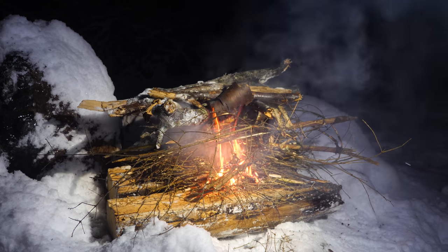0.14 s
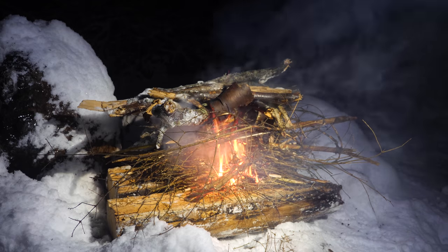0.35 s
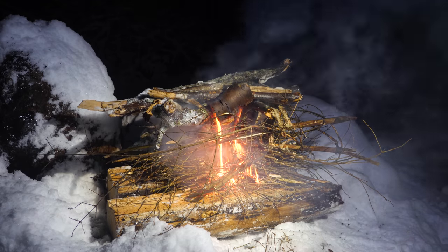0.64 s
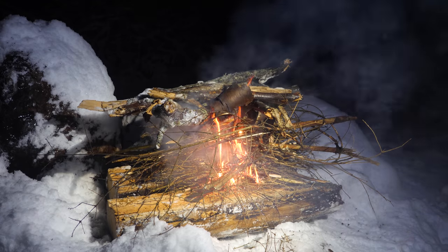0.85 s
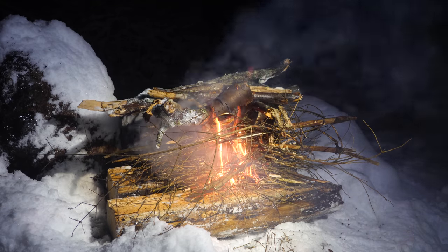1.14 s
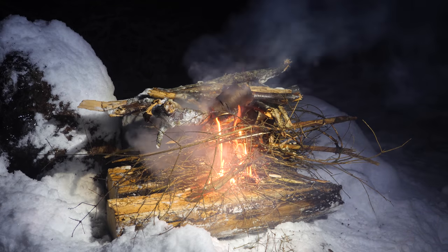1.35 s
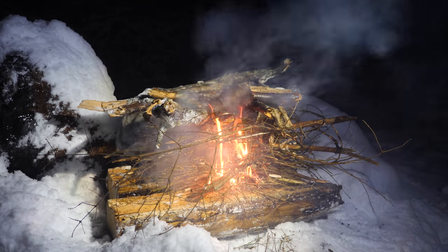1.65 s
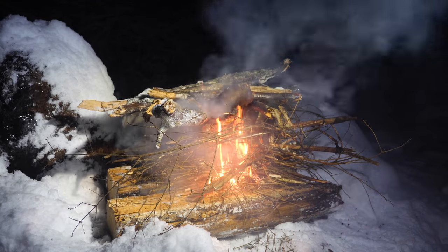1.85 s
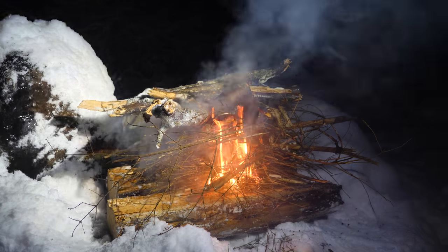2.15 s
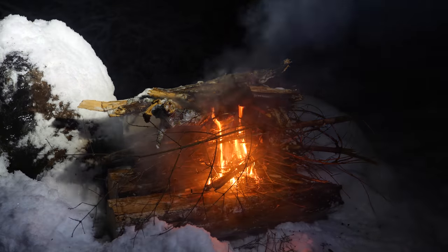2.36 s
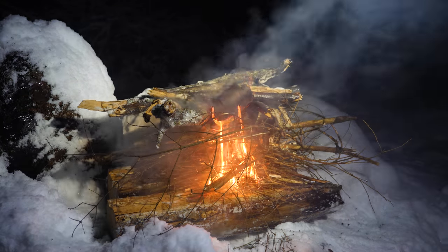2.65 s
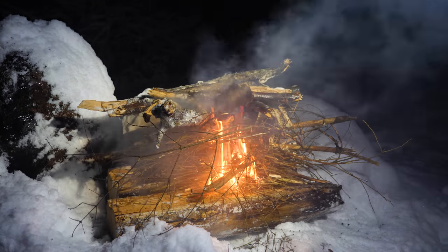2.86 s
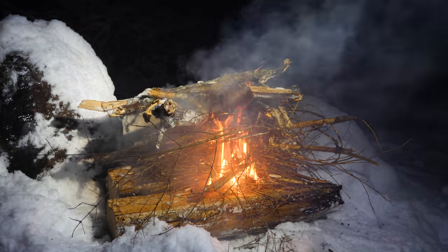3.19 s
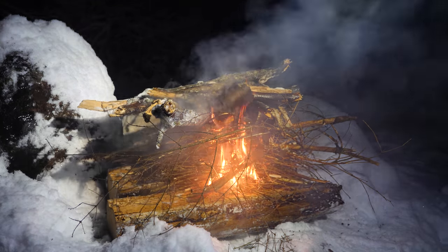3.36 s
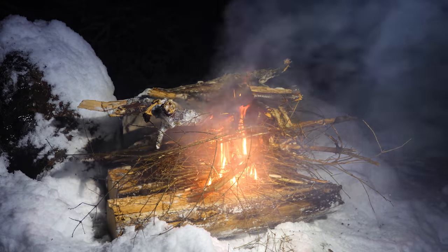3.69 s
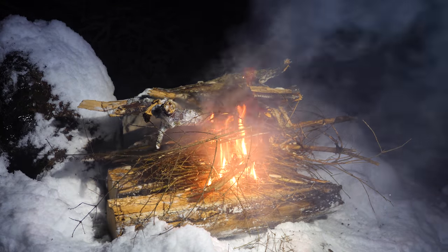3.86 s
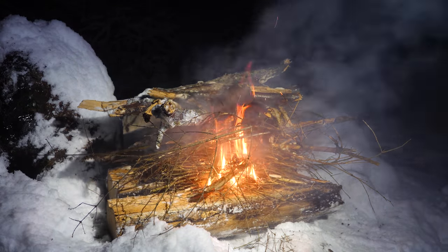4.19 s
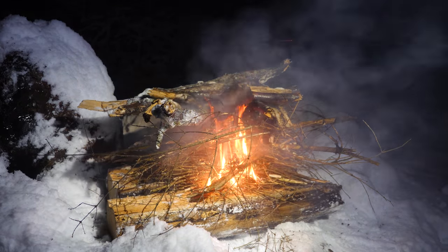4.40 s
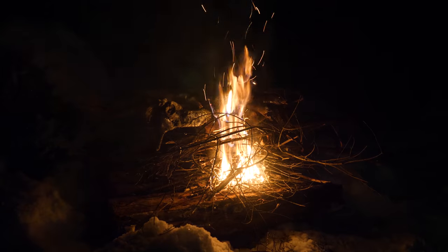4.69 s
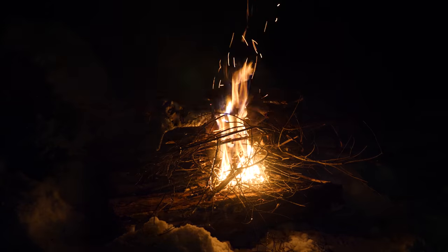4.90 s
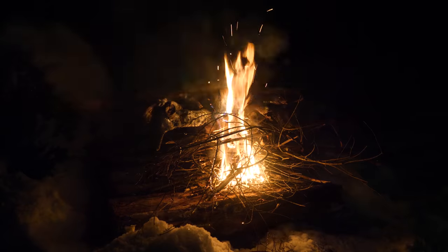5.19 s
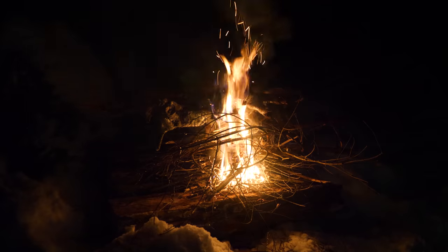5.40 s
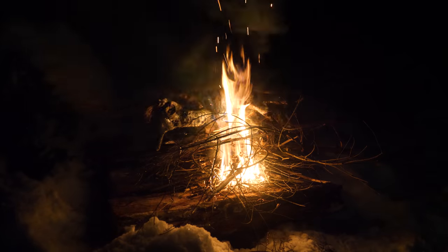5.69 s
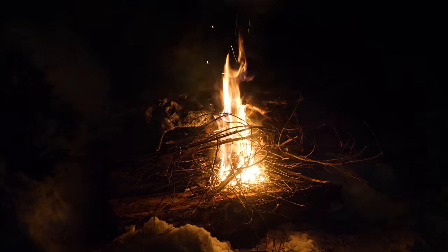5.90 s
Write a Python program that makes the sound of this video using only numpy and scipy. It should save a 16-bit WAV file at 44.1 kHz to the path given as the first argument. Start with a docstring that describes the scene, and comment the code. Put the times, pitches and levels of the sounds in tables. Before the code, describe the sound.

Close campfire crackling outdoors, without room reverberation. Irregular snaps with brief spits of steam stand out over tiny ticks, soft seething and a faint hollow draught. Isolated strong cracks arrive around the middle; after four and a half seconds the flame puffs more fully and pops crowd together, with short low log knocks. The fire is centred, with slight patchy treble width.

```python
"""A campfire of wet logs and twigs in the snow at night, heard close up on a small microphone.
Pockets of steam and resin burst in the wood: each is a short crack and a jet of treble noise, with a faint
noise rising for a few milliseconds before it. A fine crackle of small pockets runs in flurries between the
loud pops, and logs give short dull knocks, often together with a pop.
Beneath lie shaped noises: the flutter of the flame, a hollow draught through the stack and the hiss of sap."""
import sys
import numpy as np
from scipy import signal
from scipy.fft import rfft, irfft
from scipy.io import wavfile
from scipy.ndimage import uniform_filter1d, map_coordinates

SR = 44100
rng = np.random.default_rng(int(sys.argv[2]) if len(sys.argv) > 2 else 0)


def how_loud(loudness_db):
    """Turn decibels into a plain amplitude multiplier (0 dB gives 1, 20 dB gives 10)."""
    steps = np.asarray(loudness_db, float) / 20
    return 10 ** steps


def unload_audio(sound):
    """Save the sound as a 16-bit wav file, at the path given as the first command line argument."""
    columns = np.transpose(np.atleast_2d(sound))
    # keep every value between -1 and 1, then stretch to whole-number steps
    steps = np.round(np.clip(columns, -1, 1) * 32767)
    wavfile.write(sys.argv[1], SR, steps.astype(np.int16))


N = 266364
LENGTH = 448  # samples of one burst

# loud pockets bursting: (t/s, level/dB, nominal crack f/Hz, jet gain/dB re crack)
POPS = [(0.0941, -19, 3940, -8), (0.3085, -16, 3750, -4), (0.3179, -13.5, 1820, -1), (0.356, -14, 4730, 0),
        (0.4624, -5.5, 1920, 2.5), (0.7472, -11, 2020, -1.5), (0.778, -25.5, 4930, 15),
        (0.865, -19.5, 2580, 7), (0.958, -25.5, 4260, 11.5), (1.0576, -22, 2430, -12),
        (1.0778, -17, 2660, -3), (1.1015, -12.5, 2100, -12), (1.3306, -21, 4700, 17.5),
        (1.3886, -17.5, 3030, 8), (1.4516, -12.5, 3780, -0.5), (1.5701, -20.5, 3080, 0),
        (1.601, -31, 5350, 19), (1.6247, -22.5, 2470, 12), (1.671, -28.5, 2610, 18),
        (1.8223, -14.5, 2950, -2), (1.84, -22, 4750, 22.5), (2.0306, -18, 3670, 6),
        (2.1093, -12, 5030, 3.5), (2.2383, -13.5, 3120, 6), (2.266, -19.5, 1720, 4),
        (2.313, -15, 2380, 4.5), (2.479, -2, 3000, -4), (2.5546, -23.5, 4890, 12), (2.579, -18, 2350, -13),
        (2.5905, -11, 3330, 3.5), (2.7074, -8, 4000, 0), (2.7463, -18.5, 3040, 4), (2.799, -26, 3500, 20),
        (2.837, -13.5, 2750, -27), (2.8576, -3.5, 2120, 1), (2.902, -25, 3250, 16.5),
        (2.9509, -21, 3010, 4), (3.0971, -2, 3070, -3), (3.1398, -18, 2970, -1), (3.1515, -17.5, 2960, 4),
        (3.3011, -18, 2560, 8), (3.3402, -12.5, 3200, 4.5), (3.414, -35, 1770, 20.5),
        (3.4914, -14, 3040, 16.5), (3.5372, 1.5, 1930, -10), (3.589, -13.5, 4900, -8),
        (3.6272, -19.5, 4700, 9), (3.76, -18.5, 2540, 12), (3.7823, -17, 1710, 6), (3.8493, -26, 2740, 20),
        (3.9109, -30.5, 2680, 21), (3.9455, -2, 2060, 6), (4.1501, -7, 2530, 5.5), (4.1723, -13, 2720, -3),
        (4.2353, -6.5, 2390, -5.5), (4.295, -18.5, 3180, 4), (4.3507, -12.5, 3060, 4),
        (4.368, -27, 3760, 21), (4.4533, -16, 1930, -5), (4.4825, -8, 2570, -2), (4.55, -23, 5170, 13),
        (4.5725, -0.5, 2430, 9), (4.7314, -14.5, 2550, 6), (4.746, -14.5, 2500, 5), (4.7939, 1.5, 2040, 3),
        (4.8124, 0, 3190, -17), (4.877, -18, 1250, 3), (4.8985, 1.5, 2090, -2), (4.9144, -4.5, 1220, 3.5),
        (4.9742, -20, 2300, -2), (5.0833, -10, 2530, -4), (5.1624, -21.5, 5400, 11),
        (5.2595, -18, 3000, -5), (5.2489, -2, 3370, -5.5), (5.3414, -16, 1930, 6), (5.3917, 5.5, 2674, -19),
        (5.443, -22, 5360, 8), (5.469, -14.5, 4960, -7), (5.4921, -16, 2740, -15), (5.5421, 6, 3230, -41),
        (5.566, -12, 2420, -17), (5.6874, -16.5, 1730, 8), (5.714, -5, 2680, -30), (5.718, -6, 2670, -26),
        (5.7781, -12, 3670, 3.5), (5.8088, -15.5, 1720, 7.5), (5.8302, -17.5, 2450, 9),
        (5.8501, -21.5, 3980, 21), (5.88, -1.5, 3230, -5), (5.9109, -5.5, 3300, -7),
        (6.0132, -22, 4770, 12)]


def unit(x):
    """Scales to energy 1 along the last axis."""
    return x / np.sqrt(np.sum(x ** 2, -1, keepdims=True) + 1e-20)


def along(points, hz):
    """Gain at hz through (f/Hz, level/dB) points, joined on a log frequency axis."""
    f, db = np.transpose(points)
    return how_loud(np.interp(np.log(hz + 1), np.log(f + 1), db))


def wobble(rate):
    """A smooth random curve through normal knots, rate knots a second."""
    knots = rng.standard_normal(int(N * rate / SR) + 4)
    return map_coordinates(knots, [np.arange(N) * rate / SR])


def rush(spectrum):
    """Steady noise of rms 1 with the given spectrum, silent below its first point."""
    hz = np.fft.rfftfreq(N, 1 / SR)
    gain = (hz > spectrum[0][0]) * along(spectrum, hz)
    noise = irfft(rfft(rng.standard_normal(N)) * gain, N)
    return unit(noise) * np.sqrt(N)


def high(x, hz, order=2):
    """Butterworth high-pass."""
    return signal.sosfilt(signal.butter(order, hz, "high", fs=SR, output="sos"), x)


def blaze():
    """Strength of the fire over time, in dB."""
    # how the fire draws up and settles: (t/s, level/dB)
    fire_strength = [(0, 1), (4.4, 2), (4.9, 7), (6.04, 5)]
    return np.interp(np.arange(N) / SR, *np.transpose(fire_strength))


def flame():
    """The flame flutters low; as it strengthens it puffs in lumps that reach higher."""
    # flutter of the flame: (f/Hz, level/dB)
    flutter_spectrum = [(25, 7.5), (62, 15), (125, 12), (250, 4), (420, -15)]
    blaze_db = blaze()
    flutter = how_loud(-54 + blaze_db + 1.43 * wobble(16)) * rush(flutter_spectrum)
    # the puffs gain 1.61 dB for each dB of blaze
    puff_db = -62 + 1.61 * blaze_db + 3.8 * wobble(16)
    puffs = how_loud(puff_db) * rush([(170, -20.0), (400, -1.5), (600, -24.0)])
    return flutter + puffs


def draught():
    """Air drawn through the stack gives a hollow noise that grows with the blaze."""
    # hollow rush between the logs: (f/Hz, level/dB)
    draught_spectrum = [(200, -5), (420, -0.5), (800, 6), (1200, -4), (2000, -24.5)]
    return how_loud(-51 + 0.51 * blaze() + 0.94 * wobble(9)) * rush(draught_spectrum)


def sap_hiss():
    """Sap seethes unevenly in the wood, louder with the blaze."""
    # seething sap: (f/Hz, level/dB)
    sap_spectrum = [(700, -11.5), (1500, 1), (4800, -8), (6500, -16), (9000, -50)]
    return how_loud(-56 + 0.77 * blaze() + 1.7 * wobble(30)) * rush(sap_spectrum)


def sap_fizz():
    """A smooth treble fizz that flickers fast and slowly, whatever the blaze."""
    # treble fizz: (f/Hz, level/dB)
    fizz_spectrum = [(4000, -14), (6500, -5), (16000, -10)]
    # flicker: (fast depth/dB, slow depth/dB), each scaling a random curve
    flicker = (5, 3.5)
    fizz_db = -80 + flicker[0] * wobble(70) + flicker[1] * wobble(4.2)
    return how_loud(fizz_db) * rush(fizz_spectrum)


def flurry():
    """How busy the small pockets are at each moment: flurries over a steady lull."""
    # flurries of small bursts: (t/s, extra rate/dB)
    flurry_times = [(0.1, 12), (0.5, 8.5), (0.93, 15.5), (1.45, 9.5), (1.832, 11.5), (2.198, 14),
                    (2.58, 8.5), (2.9, 16.5), (3.4, 14), (3.97, 18), (4.15, 13), (4.55, 16), (5.03, 15),
                    (5.3, 14), (5.5, 15), (5.95, 15)]
    half_length_s, lull = .08, 1.7  # the lull is relative to a 0 dB flurry
    t = np.arange(0, N + 64, 64) / SR
    rate = lull + sum(how_loud(db) * np.exp(-((t - s) / half_length_s) ** 2) for s, db in flurry_times)
    return np.interp(np.arange(N) / SR, t, rate)


def droplets():
    """Sap droplets boil off in fits, with gaps between; each is a quickly dying spit of noise."""
    # spitting droplets: (f/Hz, level/dB)
    spark_spectrum = [(1500, -1.5), (3500, 2), (7000, -6), (16000, -16)]
    per_second, decay_s = 50, .0006  # the rate holds at unit busyness
    chance, size = rng.random((2, N))
    starts = chance < per_second / SR * flurry() * how_loud(7 * wobble(30))
    # few droplets are large
    spikes = signal.lfilter([1], [1, -np.exp(-1 / (decay_s * SR))], starts * size ** -.4)
    spits = unit(spikes * rush(spark_spectrum)) * np.sqrt(N)
    return how_loud(-60.5 + 0.77 * blaze()) * spits


def swing(hz, cycles):
    """A damped swing that starts softly with a pull; cycles is its decay constant."""
    turn = np.arange(LENGTH) / SR * hz[:, None]
    onset = 1 - np.exp(-turn / 0.36)
    return unit(-np.sin(2 * np.pi * turn) * np.exp(-turn / cycles) * onset)


def scattered(sound, echo_db, echo_s):
    """Spiky echoes off the logs, new for every place in the stack."""
    t = np.arange(LENGTH) / SR
    spikes = rng.standard_normal(sound.shape) ** 3 * np.exp(-t / echo_s) * (t > .0003)
    echo = how_loud(echo_db) * unit(spikes)
    echo = 1.24 * uniform_filter1d(echo, size=4)  # rough bark returns less treble
    echo[:, 0] = 1  # the direct sound
    return signal.fftconvolve(sound, unit(echo), axes=1)[:, :LENGTH]


def placed(s, db, sound):
    """Rows of sound laid at their times and levels, overlaps added."""
    at = np.round(s * SR).astype(int).clip(0)[:, None] + np.arange(LENGTH)
    weighted = how_loud(db)[:, None] * sound
    return np.bincount(at.ravel(), weighted.ravel(), N + LENGTH)[:N]


def bursts(rows, echo_db, echo_s, jet_s, lead_in_db, split_share):
    """Each pocket gives a brief crack and a steam jet after a rising noise; near the gap's pitch it rings."""
    # a gap between the logs: (f/Hz, half-width/Hz, largest ringing share 0-1)
    hollow = (3280, 78, 0.53)
    lead = 160  # samples of noise before a burst
    s, db, hz, jet_db = np.transpose(rows)
    t = np.arange(LENGTH) / SR
    noise, hiss = rng.standard_normal((len(s), 2, LENGTH)).transpose(1, 0, 2)
    # the jet: one sharp wide-band split, then a dying sputter of treble
    split = unit(high(-1. * (np.arange(LENGTH) == 3), hz=2570))
    sputter = unit(high(noise ** 3 * np.exp(-t / jet_s), hz=6260, order=3))
    jet = split_share * split + (1.6 - split_share) * sputter
    # a small source radiates no bass
    crack = unit(high(swing(1.03 * hz, cycles=0.2), hz=1320, order=1))
    share = hollow[2] / (1 + ((hz - hollow[0]) / hollow[1]) ** 2)[:, None]
    sound = scattered((1 - share) * crack + how_loud(jet_db)[:, None] * jet, echo_db, echo_s)
    sound += share * swing(np.full_like(hz, hollow[0]), cycles=4)
    # a noise rises over a few milliseconds before each burst
    lead_in = unit(high(hiss * np.exp(t / .0012) * (t < lead / SR), hz=1500))
    return placed(s, db, sound) + placed(s - lead / SR, db + lead_in_db, lead_in)


def crackle(count=1200):
    """Small pockets in twigs and bark: many faint, few strong, coming in flurries."""
    faintest_db, spread_db, top_db = -41, 7, 16.5  # spread and largest excess above the faintest
    when, size, pitch, bright, wet = rng.random((count, 5)).T
    spurt_s = .0005 * 7 ** wet[:, None]  # dry pockets tick, wet ones spit for longer
    # times drawn in proportion to the busyness
    busy = np.cumsum(flurry() * how_loud(6.0 * wobble(35)))
    at = np.interp(when, busy / busy[-1], np.arange(N) / SR)
    db = faintest_db + np.minimum(-spread_db * np.log(size), top_db)
    rows = np.transpose([at, db, 1600 * 3.2 ** pitch, -2 + 14 * bright])
    return bursts(rows, echo_db=-5, echo_s=.0009, jet_s=spurt_s, lead_in_db=-11, split_share=.7)


def pops():
    """Large pockets burst loudly, their echoes lasting longer than those of the crackle."""
    return bursts(POPS, echo_db=-8, echo_s=.0018, jet_s=.0008, lead_in_db=-21, split_share=.75)


def aftercracks():
    """Each pop sets off one small, higher neighbour a few milliseconds later."""
    s, db, hz, _ = np.transpose(POPS)
    wait, size, bright = rng.random((len(s), 3)).T
    at = s + 0.0016 + wait * (0.0051 - 0.0016)  # shortest to longest wait, in seconds
    rows = np.transpose([at, db - 18 - 6 * size, 1.65 * hz, 6 * bright])
    return bursts(rows, echo_db=-3, echo_s=.0009, jet_s=.0012, lead_in_db=-15, split_share=.7)


def knocks():
    """Logs give short dull knocks, often together with a pop: each a damped low swing with echoes."""
    # knocking logs: (t/s, level/dB, f/Hz)
    log_knocks = [(0.3166, -17, 824), (0.7471, -19, 593), (2.837, -17, 790), (3.5372, -1, 516),
                  (3.5366, -10, 162), (3.877, -12.5, 806), (3.9455, -13, 1250), (4.2085, -13, 418),
                  (4.5718, -2, 920), (4.7939, -10, 507), (4.8985, -5.5, 960), (4.9144, -6.5, 596),
                  (5.541, -3, 810)]
    s, db, hz = np.transpose(log_knocks)
    notes = high(swing(hz, cycles=.75), hz=110)
    return placed(s, db, scattered(notes, echo_db=-12, echo_s=0.0012))


def scene():
    """The steady bed, crackle, pops and knocks, all from straight ahead."""
    bed = flame() + draught() + sap_hiss() + sap_fizz() + droplets()
    fire = bed + crackle() + pops() + aftercracks() + knocks()
    return np.array([fire, fire])


def top_cut(x):
    """Nothing passes above the cut-off."""
    return signal.sosfilt(signal.butter(12, 16820, fs=SR, output="sos"), x)


def record(dry):
    """The microphone port dips above the presence range; a patchy left-right noise follows the mono sound."""
    # microphone response: (f/Hz, level/dB)
    mic_response = [(3300, 0), (5000, -2.5), (6400, -9.5), (10500, -7), (16000, -15.5), (16500, -48),
                    (16900, -95)]
    # left-right noise before gating and compression: (f/Hz, level/dB re the sum)
    side_spectrum = [(300, -16.5), (2500, -20), (6000, -5.5), (15000, -4)]
    mid = irfft(rfft(dry[0]) * along(mic_response, np.fft.rfftfreq(N, 1 / SR)), N)
    hz, _, z = signal.stft(mid, SR, nperseg=512)
    # a random field, smoothed over frequency and time, gates the side noise
    field, spin = rng.standard_normal(z.shape), rng.random(z.shape)
    field = uniform_filter1d(uniform_filter1d(field, size=24, axis=0), size=5, axis=1)
    gate = np.clip((field / field.std() - .1) * 3, 0, 1)
    # in loud moments the side noise rises less than the sound
    loudness = np.abs(z) / np.median(np.abs(z), axis=1, keepdims=True)
    z = z * (1 + loudness / 8) ** -.4
    # random phases turn the copied sound into noise
    z = z * along(side_spectrum, hz)[:, None] * gate * np.exp(2j * np.pi * spin)
    side = signal.istft(z, SR, nperseg=512)[1][:N]
    return top_cut(mid + side * [[1], [-1]])


dry = scene()
out = record(dry)
unload_audio(out)
```